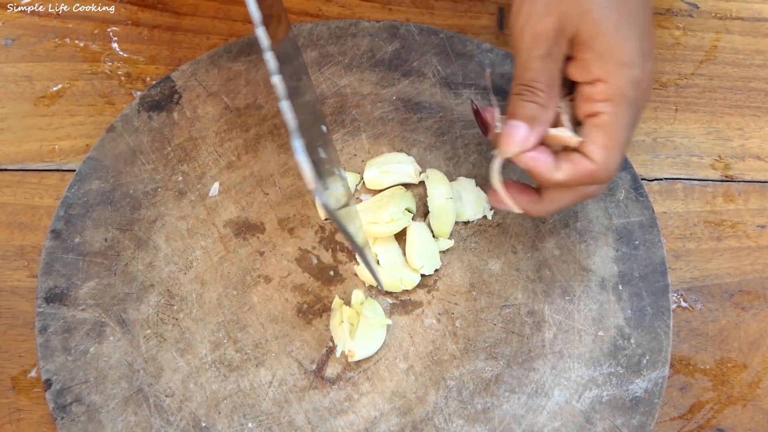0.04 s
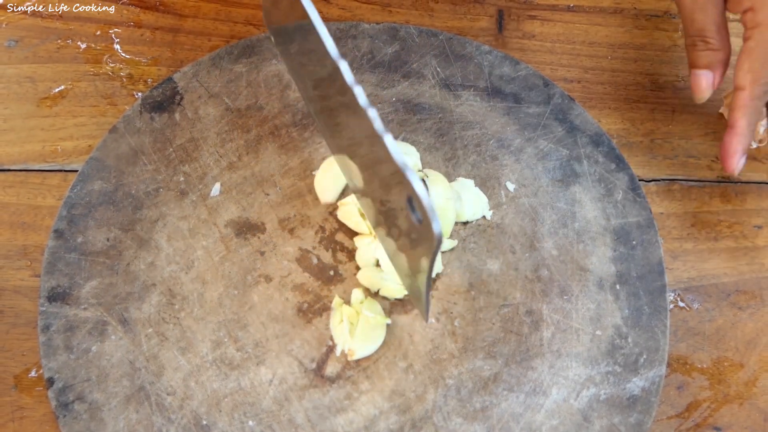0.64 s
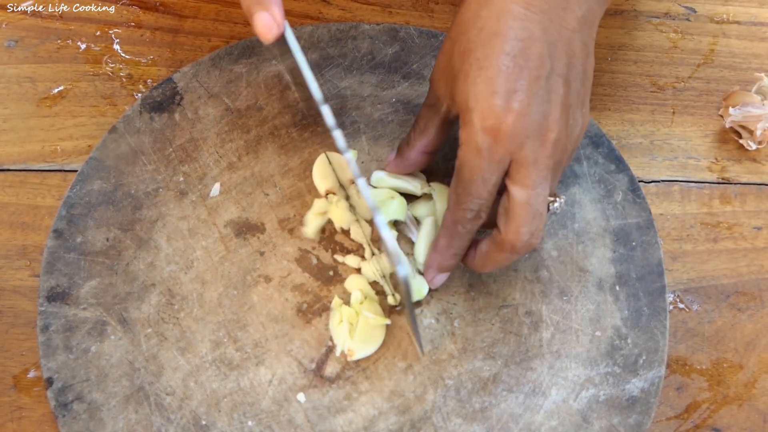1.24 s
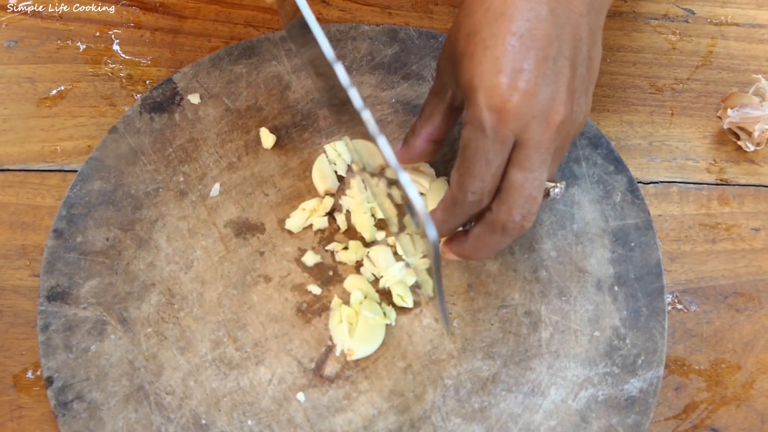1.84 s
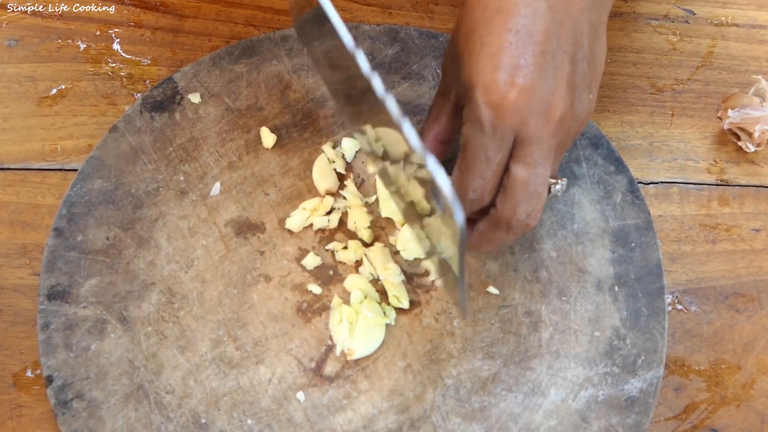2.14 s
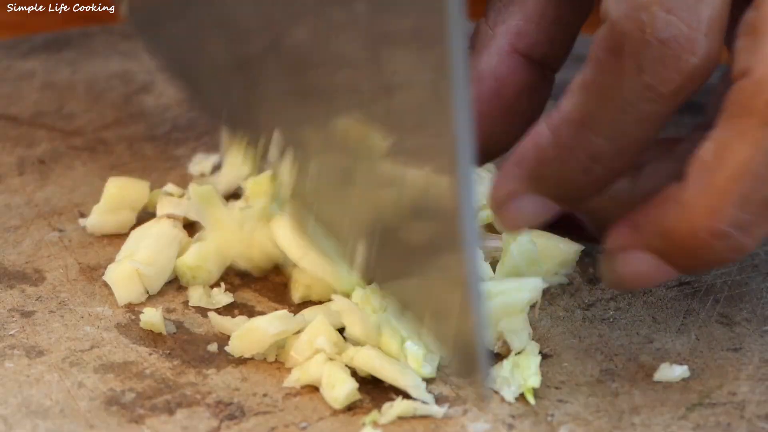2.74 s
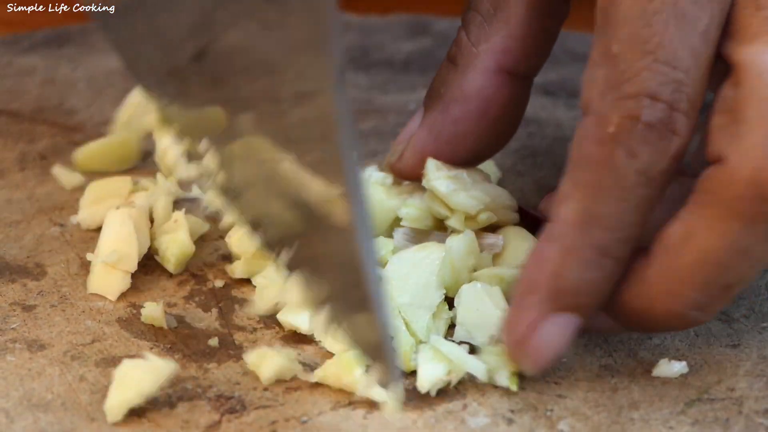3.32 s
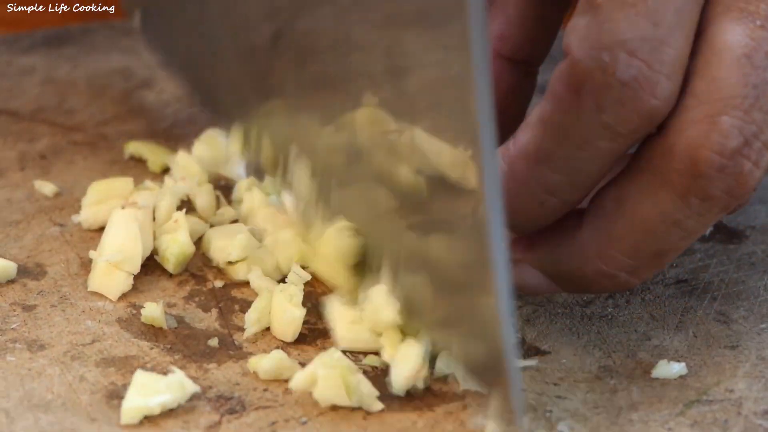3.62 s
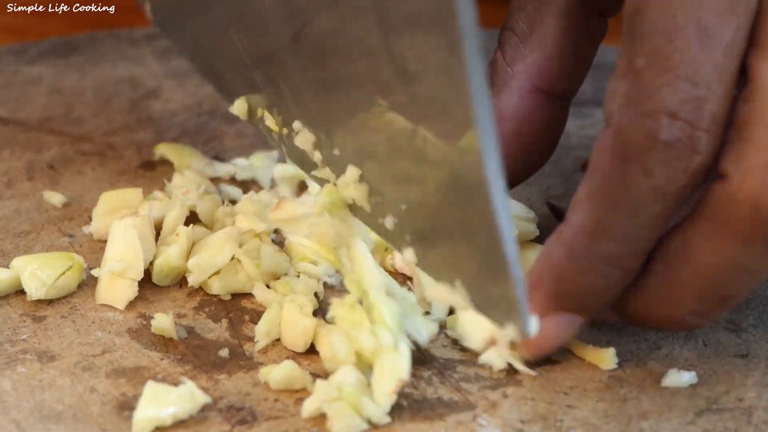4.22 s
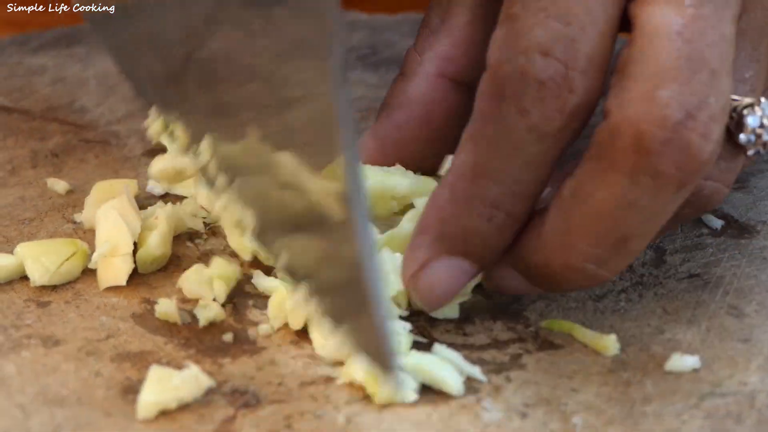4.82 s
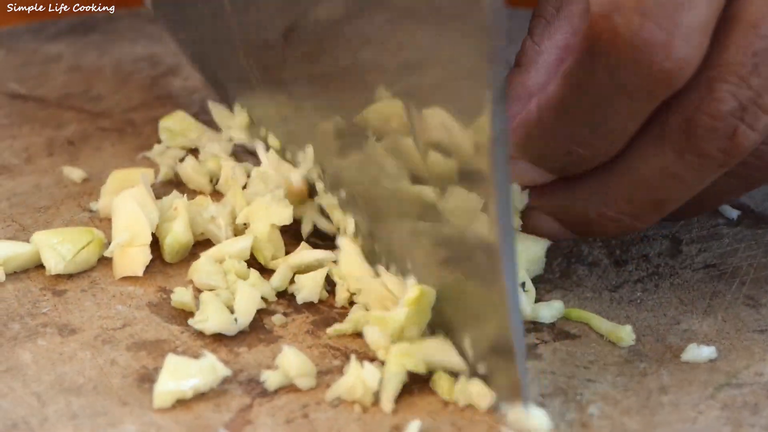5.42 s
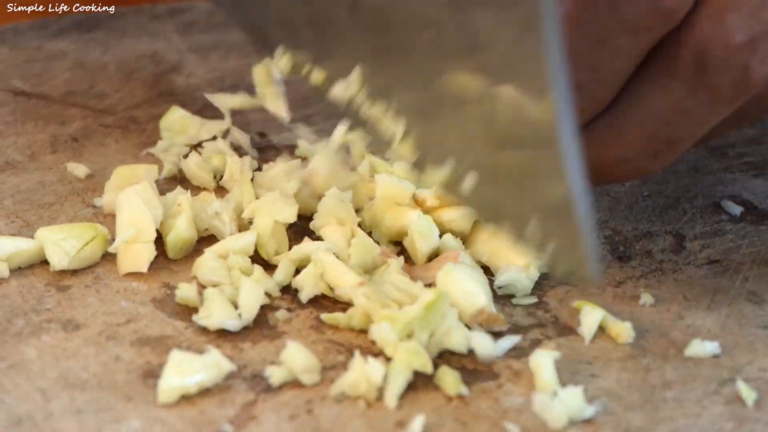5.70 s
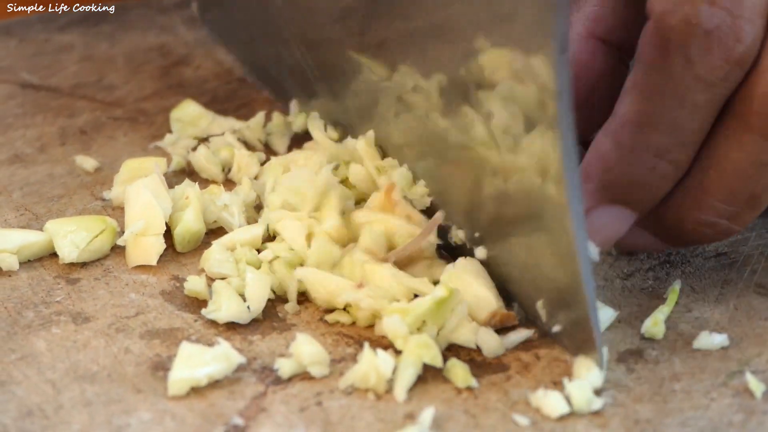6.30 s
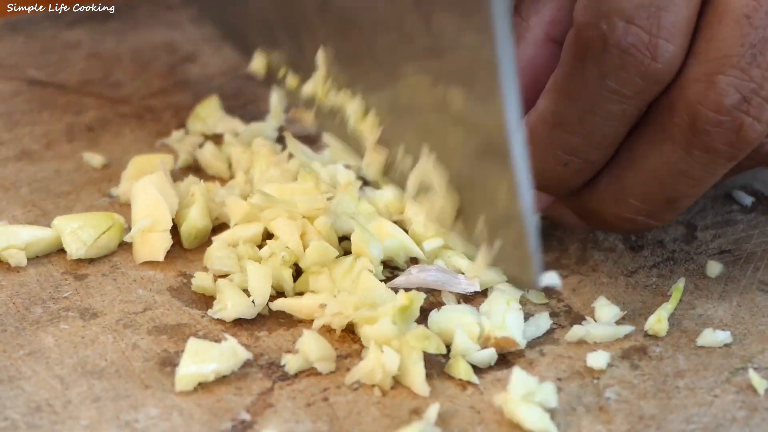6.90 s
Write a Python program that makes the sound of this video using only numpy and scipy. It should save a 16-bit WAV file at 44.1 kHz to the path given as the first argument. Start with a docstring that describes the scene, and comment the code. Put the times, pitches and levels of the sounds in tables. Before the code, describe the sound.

Dry garlic skins snap and rustle briefly under fingers. A cleaver makes two gentle cuts, then chops steadily, about four strokes a second, each a small crunch with a knock and thump on a thick wooden block. Partway through, the microphone moves closer and the thumps grow fuller. The place is half outdoors, with soft air noise, a far motor hum and faint birds.

```python
"""Half outdoors, over soft air noise and a far motor, small birds peep and a hand brushes dry skins away. Then
a cleaver starts on garlic, gently at first, on a thick round wooden block on a plank table. Each stroke
crunches through the cloves, knocks on the block and thumps the block on the table; nearby walls answer. Part
way through, the scene changes to close beside the block and the thumps grow stronger."""
import sys
import numpy as np
from scipy import signal
from scipy.fft import rfft, irfft
from scipy.io import wavfile
from scipy.ndimage import uniform_filter1d

SR = 44100
rng = np.random.default_rng(int(sys.argv[2]) if len(sys.argv) > 2 else 0)


def inscribe(sig):
    """Save sig as 16-bit PCM at rate SR to the path in sys.argv[1].

    A 1-D sig is mono; a 2-D sig holds one channel per row.
    Samples are clipped to [-1, 1] before scaling.
    """
    pcm = np.round(np.clip(np.atleast_2d(sig).T, -1, 1) * 32767)
    wavfile.write(sys.argv[1], SR, pcm.astype(np.int16))


N = 306483
TIME = np.arange(N) / SR
MOVE_S = 2.748  # when the scene changes from above the block to close beside it; the echoes from above stop short


def gain_of(db):
    """Turns decibels into a number to multiply by."""
    return 10 ** (np.asarray(db) / 20)


def unit_level(x):
    """Scales a signal to an average (rms) level of 1."""
    return x / np.sqrt(np.mean(x ** 2) + 1e-20)


def with_energy(x, db):
    """Gives a short sound as much energy as 10 ms of steady sound at this level."""
    return x * gain_of(db) / np.sqrt(np.sum(x ** 2) * 100 / SR + 1e-20)


def curve_at(points, hz):
    """Looks up values between a table's rows, on a log frequency scale."""
    row_hz, value = np.transpose(points)
    return np.interp(np.log(hz + 1), np.log(row_hz + 1), value)


def coloured(x, tone):
    """Turns frequencies up or down by a table of frequency_hz, gain_db."""
    hz = np.fft.rfftfreq(x.shape[-1], 1 / SR)
    return irfft(rfft(x) * gain_of(curve_at(tone, hz)), x.shape[-1])


def cut_below(x, hz, order=3):
    """Fades out what lies below hz; a higher order cuts more steeply."""
    return signal.sosfilt(signal.butter(order, hz, "high", fs=SR, output="sos"), x)


def add(mix, start_s, sound):
    """Mixes a sound in from start_s on."""
    start = round(start_s * SR)
    sound = sound[max(-start, 0):]
    part = mix[max(start, 0):][:len(sound)]
    part += sound[:len(part)]


def struck(tone_db):
    """Makes a sudden, fading tap with this tone (one level for each frequency step)."""
    log_gain = np.log(gain_of(np.r_[tone_db, tone_db[-2:0:-1]]))
    spectrum = np.exp(np.conj(signal.hilbert(log_gain)))  # packs the energy at the start
    return np.fft.ifft(spectrum).real[:len(tone_db)]


def waver(size, hz):
    """A random wobble of level and phase that changes about hz times a second."""
    noise = rng.standard_normal(size) + 1j * rng.standard_normal(size)
    keep_slow = np.exp(-(np.fft.fftfreq(size, 1 / SR) / hz) ** 2)
    wobble = np.fft.ifft(np.fft.fft(noise) * keep_slow)
    return wobble / np.sqrt(np.mean(abs(wobble) ** 2))


def outdoor_air(air_db=-56.5):
    """Steady low air noise and a soft hiss that comes and goes."""
    # the tone of each noise: frequency_hz, gain_db
    air_tone = [(20, -37), (45, -0.5), (75, -8), (150, 0), (260, -3.5), (480, -13.5), (1000, -9),
                (2000, -18.5), (4500, -25), (7800, -36.5), (10000, -52), (13000, -45), (16000, -68)]
    hiss_tone = [(100, 3), (400, 2), (1500, 5), (3500, 5), (5500, 1), (7800, -2), (10000, -1), (12500, -10),
                 (16000, -21)]
    # how the hiss rises and falls: time_s, level_db
    hiss_levels = [(0.0, -54.5), (0.5, -58.5), (0.6, -56.5), (1.55, -67.5), (2.75, -61), (2.88, -53),
                   (3.19, -60), (3.48, -58), (3.6, -53), (3.72, -58), (4.28, -61), (6.64, -67), (6.95, -63)]
    # how alike left and right are: frequency_hz, likeness (0 to 1)
    ear_likeness = [(30, 0.32), (150, 0.86), (500, 0.58), (2000, 0.55), (12000, 0.63)]
    alike = np.clip(curve_at(ear_likeness, np.fft.rfftfreq(N, 1 / SR)), 0, 1)
    left, unrelated = rfft(rng.standard_normal((2, 2, N)))
    right = alike * left + np.sqrt(1 - alike ** 2) * unrelated
    air, hiss = np.swapaxes(irfft(np.array([left, right]), N), 0, 1)
    air = gain_of(air_db) * unit_level(coloured(air, air_tone))
    hiss_gain = gain_of(np.interp(TIME, *np.transpose(hiss_levels)))
    return air + hiss_gain * unit_level(coloured(hiss, hiss_tone))


def far_motor(above_db=-4, close_db=0.5):
    """A far motor hums, a little louder once the scene has changed."""
    # its wavering tones: pitch_hz, level_db (before above_db or close_db is added)
    tones = [(75, -73.5), (152, -60), (222, -68), (404, -70.5)]
    hum = sum(gain_of(db) * unit_level((waver(N, 20) * np.exp(2j * np.pi * hz * TIME)).real)
              for hz, db in tones)
    return hum * gain_of(np.where(TIME < MOVE_S, above_db, close_db))


def bird_note(length_s, hz, fall_hz_per_s, blur_hz):
    """One note, level or falling, blurred by distance."""
    t = np.arange(-length_s / 2, length_s / 2, 1 / SR)
    cycles = np.cumsum(hz - fall_hz_per_s * t) / SR
    note = (waver(len(t), blur_hz) * np.exp(2j * np.pi * cycles)).real
    return unit_level(note * np.hanning(len(t)) ** 0.23)


def birds(peep_s=0.085, hoot_s=0.055):
    """One far bird peeps high and falling, another gives three low notes."""
    # the high bird: middle_s, pitch_hz, level_db
    peeps = [(.02, 4670, -54.5), (0.461, 5170, -51.5), (0.84, 4800, -56), (3.46, 4220, -55),
             (4.747, 4300, -62.5), (5.382, 4530, -60), (6.917, 4680, -62.5)]
    # the low bird: middle_s, level_db
    hoots = [(.455, -54), (0.573, -52.5), (0.683, -56)]
    out = np.zeros(N)
    for s, hz, db in peeps:
        add(out, s - peep_s / 2, gain_of(db) * bird_note(peep_s, hz, fall_hz_per_s=9100, blur_hz=1400))
    for s, db in hoots:
        add(out, s - hoot_s / 2, gain_of(db) * bird_note(hoot_s, hz=1014, fall_hz_per_s=0, blur_hz=43))
    return out


def wall_echoes(x, tone, echo_db, late_db, late_fade_s, width=0.26, first_s=0.0036, build_s=0.0011):
    """Table and walls throw back many quick echoes, then a faint longer tail; partly alike in both ears."""
    # how fast the quick echoes die: frequency_hz, fade_s (time to drop 60 dB)
    early_fades = [(100, 0.15), (400, 0.15), (1200, 0.18), (3000, 0.09), (10000, .09)]
    # the longer tail, strongest in the middle: frequency_hz, gain_db
    late_tone = [(150, -3.5), (600, -4.5), (1200, 7), (2300, 2.5), (4500, -7), (12000, -24)]
    size = SR * 2 // 3
    mid, side = rng.choice([-1., 1.], (2, size)) * (rng.random((2, size)) < 6000 / SR)  # 6000 a second
    hz, t, bands = signal.stft(np.array([mid + width * side, mid - width * side]), SR, nperseg=256)
    early = gain_of(-60 * t / curve_at(early_fades, hz)[:, None])
    late = gain_of(late_db + curve_at(late_tone, hz)[:, None] - 60 * t / late_fade_s)
    tail = signal.istft(bands * (early + late), SR, nperseg=256)[1][:, :size]
    tail *= np.clip((TIME[:size] - first_s) / build_s, 0, 1)
    # many paths share the energy evenly over neighbouring frequencies
    spectrum = rfft(tail)
    spectrum /= np.sqrt(uniform_filter1d((abs(spectrum) ** 2).mean(0), size=90))
    tail = coloured(irfft(spectrum, size), tone)
    return gain_of(echo_db) * signal.fftconvolve(x[None], tail, axes=1)[:, :N]


def shifting_echoes(x, tone, echo_db, late_db, late_fade_s, patterns=3, shift_hz=0.63):
    """Hands and blade keep moving, so the pattern of echoes shifts from stroke to stroke."""
    shares = [np.sqrt(2 / patterns) * np.cos(np.pi * (2 * shift_hz * TIME + k / patterns))
              for k in range(patterns)]
    return sum(wall_echoes(x * share, tone, echo_db, late_db, late_fade_s) for share in shares)


def crackle(spread_s, tone, grain_db):
    """A cloud of tiny cracks, strongest at its middle; more grain_db makes it rougher."""
    t = np.arange(-SR // 8, SR // 8) / SR
    crack_sizes = gain_of(grain_db * np.minimum(rng.exponential(1, len(t)), 5))
    swell = np.exp(-(abs(t) / (1.12 * spread_s)) ** 0.81)
    cloud = rng.standard_normal(len(t)) * crack_sizes * swell
    return cut_below(coloured(cloud, tone), hz=200)


def garlic_skins(snap_boost_db=4, small_snaps=12, clearing_s=(0.17, 0.69)):
    """Papery skins snap and rustle under the fingers."""
    # the main snaps: time_s, peak_db (before the boost)
    snaps = [(0.0624, -32.5), (0.2225, -29), (0.267, -36), (0.393, -36), (0.4447, -34.5), (0.5436, -31),
             (1.278, -40)]
    # fingers and blade brushing the garlic: middle_s, level_db (before length_gain), spread_s
    brushes = [(0.209, -51.5, 0.0066), (0.279, -56.5, 0.0071), (.343, -42.5, 0.008), (.47, -54.5, 0.05),
               (.57, -53, 0.037), (0.877, -54, 0.022), (1.327, -37, 0.0036), (2.262, -49, 0.0038)]
    # the tone of a snap and of a brush: frequency_hz, gain_db
    snap_tone = [(500, -22), (3000, 2.5), (6000, 2), (8000, 0), (10500, 9.5), (13000, -3.5), (16000, -6)]
    brush_tone = [(300, 9), (1500, -4.5), (3000, 3), (5500, 2.5), (7800, -2.5), (10300, 0.5), (13000, -12),
                  (16000, -17)]
    out = np.zeros(N)
    # smaller snaps fall at random while the hand clears the skins
    small = [(rng.uniform(*clearing_s), rng.normal(-42.5, 5)) for _ in range(small_snaps)]
    for s, db in snaps + small:
        snap = crackle(0.00055, snap_tone, grain_db=2)
        add(out, s + 0.0013 - len(snap) / SR / 2, gain_of(db + snap_boost_db) * snap / abs(snap).max())
    for s, db, spread_s in brushes:
        brush = crackle(spread_s, brush_tone, grain_db=3)
        length_gain = np.sqrt(spread_s / 0.0042)
        add(out, s - len(brush) / SR / 2, with_energy(brush, db) * length_gain)
    return out


def block_thump(hz, swell_cycles=0.46, still_hz=410, still_width_hz=130):
    """The heavy block sinks into the table and rocks back, for about two cycles."""
    cycles = hz * np.arange(SR // 12) / SR
    age = cycles / swell_cycles
    rocking = -np.sin(2 * np.pi * (cycles - .06)) * (age * np.exp(1 - age)) ** 1.61
    # the wood barely moves between its rocking pitch and its knocking pitch
    rocking = signal.lfilter(*signal.iirnotch(still_hz, still_hz / still_width_hz, fs=SR), rocking)
    return cut_below(rocking, hz * 0.35, order=2)  # slow motion makes little sound


def blade_leans():
    """A slow push moves block and table together, lower than a chop."""
    # the blade leaning on the block around the first gentle cuts: start_s, level_db
    pushes = [(0.346, -45), (0.614, -27), (0.851, -29.5)]
    out = np.zeros(N)
    for s, db in pushes:
        add(out, s, with_energy(block_thump(hz=103), db))
    return out


def wood_ring(thump_db, knock_db, split_hz=700, scatter_db=2):
    """Block and planks ring on: the thump starts their low tones, the knock their high ones."""
    # the wood's tones: pitch_hz, level_db (relative to thump or knock), fade_s (time to drop 60 dB)
    tones = [(44, -49, 0.3), (115.5, -24.5, 0.24), (152.7, -41, 0.45), (230, -67, 0.12),
             (308.2, -7.5, 0.077), (486, -30.5, 0.16), (1078, -21, 0.13), (1196, -16, 0.11)]
    t = np.arange(SR // 3) / SR
    ring = np.zeros(len(t))
    for hz, db, fade_s in tones:
        start_db = (thump_db if hz < split_hz else knock_db) + rng.normal(db, scatter_db)
        ring += gain_of(start_db - 60 * t / fade_s) * np.sin(2 * np.pi * hz * t)
    return ring * (1 - np.exp(-t / 0.00071))


def blade_ring(scatter_db=3):
    """The steel sings for a moment, differently with each grip, until hand and wood quiet it."""
    # the steel's tones: pitch_hz, level_db (relative to the crunch), fade_s (time to drop 60 dB)
    tones = [(2100, -15, 0.026), (2600, -16, .03), (3800, -4.5, 0.039), (4930, -37, 0.027), (5840, -6, .04),
             (6440, -15, 0.05), (8400, -37, 0.033), (9100, -23, .05), (10400, -22, 0.032),
             (12300, -31, 0.034)]
    t = np.arange(SR // 8) / SR
    ring = np.zeros(len(t))
    for hz, db, fade_s in tones:
        fade = gain_of(rng.normal(db, scatter_db) - 60 * t / fade_s)
        ring += fade * np.sin(2 * np.pi * (hz * t + rng.random()))
    return ring * (1 - np.exp(-t / 0.0017))


def garlic_crunch(treble_db, crush_ms):
    """Cloves split under the edge; more garlic draws the crunch out."""
    # the splitting, with a low push on the block as the cloves give way: frequency_hz, gain_db
    tone = [(50, 34), (110, 41.5), (400, 0.5), (1000, 3), (2000, 7), (3000, 3), (5500, 2), (7800, -3.5),
            (10000, 0.5), (13000, -8.5), (16000, -13.5)]
    spread_ms = 0.58 + 0.62 * max(crush_ms, 0)
    crunch = crackle(spread_ms / 1000, tone, grain_db=2.5)
    treble = cut_below(crunch, hz=5000, order=4)
    return with_energy(crunch, treble_db) * crunch.std() / treble.std()


def knock(bite_db, edge_db):
    """The edge meets the block: the spot it hits sets the woody bite, a clean hard hit adds treble."""
    # steel on end grain: frequency_hz, gain_db
    tone = [(50, -47), (150, -36), (480, -26), (650, -7), (730, -11), (820, -1.5), (950, 2.5), (1090, -7.5),
            (1240, -5), (1800, -17.5), (2200, -29.5), (2800, -26.5), (5000, -37), (8000, -57.5),
            (12000, -60), (16000, -67)]
    hz = np.fft.rfftfreq(4096, 1 / SR)
    bite_band = curve_at([(1050, 0), (1350, 1), (1950, 1), (2600, 0)], hz)
    edge_band = curve_at([(1700, 0), (2200, 1), (5000, 1), (9000, .3)], hz)
    # each spot favours other high tones
    ripple = uniform_filter1d(uniform_filter1d(rng.standard_normal(len(hz)), size=30), size=22)
    spot_db = curve_at([(900, .8), (2500, 2.5)], hz) * unit_level(ripple)
    return struck(curve_at(tone, hz) + bite_db * bite_band + edge_db * edge_band + spot_db)


def blade_landing(bite_db, edge_db, heel_db=-6, heel_delay_s=(.0012, .0033)):
    """The tip lands first, the heel (the handle end) a moment later with a thinner tick."""
    landing = knock(bite_db, edge_db)
    heel = cut_below(knock(bite_db, edge_db), hz=1500)
    add(landing, rng.uniform(*heel_delay_s), gain_of(heel_db) * heel)
    return landing


def cleaver(gentle_below_db=-28.5, thump_delay_s=0.0012):
    """Each stroke crunches through the garlic, knocks, thumps and leaves steel and wood ringing."""
    # the strokes: contact_s, knock_db, bite_db, edge_db, crunch_db, crush_ms (time spent crushing garlic)
    chops = [(0.617, -37.5, -24, 0, -37.5, 3.5), (0.8528, -33.5, -10, -11, -33, 2),
             (1.0792, -12, -1, 7.5, -34.5, 1.5), (1.3115, -12.5, 2.5, 8, -34, 2),
             (1.5449, -13, -5, -2, -35.5, 1.37), (1.7738, -15.5, -4, -6.5, -39.5, 2.5),
             (2.0065, -12, 2, 9.5, -37.5, 0.5), (2.2492, -13.5, 4, 3.5, -39.5, 2),
             (2.4794, -42, 4, -5, -39, 4), (2.7056, -13, 5.5, 9.5, -34.5, -0.07),
             (2.8463, -19.5, -5.5, 1.5, -39.5, 4.5), (3.0685, -14, 5, 4, -42.5, 1.5),
             (3.2906, -17, -2, -1, -44, 4.5), (3.509, -36.5, -6, 3, -39, 4.5),
             (3.7188, -14, 0.5, 8.5, -37.5, 1.4), (3.9331, -17, 2, 2, -40, 4.5),
             (4.1441, -16, -1.5, 3.5, -42, 1), (4.3553, -14.5, -0.5, 9, -43, 1.5),
             (4.5822, -16, -2.5, 5.5, -40.5, 0.5), (4.7905, -15.5, 2.5, 6, -43.5, 2.5),
             (4.9962, -27.5, -7, 2, -46.5, 2), (5.2064, -16.5, 3.5, -2, -45.5, 1.1),
             (5.4216, -15, 4, 3, -44.5, 0.4), (5.6374, -16.5, 2.5, 1, -46, 3),
             (5.8617, -16.5, -0.5, -1.5, -47.5, 0.7), (6.1669, -24.5, -17, -1.5, -40, 3),
             (6.371, -14.5, 6, 6, -46, 1.5), (6.5876, -17, 4.5, -5.5, -50, 4),
             (6.8154, -30, -12, 3, -45, 3.5)]
    out = np.zeros(N)
    for s, knock_db, bite_db, edge_db, crunch_db, crush_ms in chops:
        # the thump is stronger and rounder from close by, softer and lower for a gentle stroke
        full_thump_db, swell_cycles = (-15.5, 0.62) if s > MOVE_S else (-19, 0.52)
        held_back_db = max(gentle_below_db - knock_db, 0)
        thump_db = full_thump_db - 1.14 * held_back_db
        thump = block_thump(hz=238 - 2.5 * held_back_db, swell_cycles=swell_cycles)
        crunch = garlic_crunch(crunch_db, crush_ms)
        split_s = s - 0.85 * crush_ms / 1000  # more garlic starts the crunch earlier
        add(out, split_s - len(crunch) / SR / 2, crunch)
        add(out, split_s, gain_of(crunch_db) * blade_ring())
        add(out, s, with_energy(blade_landing(bite_db, edge_db), knock_db))
        add(out, s + thump_delay_s, with_energy(thump, thump_db))
        add(out, s, wood_ring(thump_db, knock_db))
    return out


def left_and_right(x):
    """Sound reaches the microphone's two openings with slightly different timing and level."""
    # how far left is ahead of right: frequency_hz, lead_radians
    lead = [(100, 0), (400, .15), (950, .62), (1300, .3), (2000, .6), (2600, -.5), (4500, -.5),
            (12000, .55)]
    # how much louder left is than right: frequency_hz, gain_db
    balance = [(100, -2), (400, -0.88), (900, -1.1), (2400, 0.81), (5000, -0.47), (15000, .3)]
    hz = np.fft.rfftfreq(N, 1 / SR)
    half = gain_of(curve_at(balance, hz) / 2) * np.exp(.5j * curve_at(lead, hz))
    return irfft(rfft(x) * np.array([half, 1 / half]), N)


def scene():
    """The block heard from above, then from close beside it."""
    # the tone of the echoes in each microphone position: frequency_hz, gain_db
    tone_above = [(60, -9.5), (150, -17), (240, -18), (340, -9.5), (470, -2.5), (600, -6), (950, -23),
                  (1300, -18), (2200, -12.5), (3400, -18.5), (9000, -18)]
    tone_close = [(60, -24), (150, -14), (240, -19.5), (330, -12.5), (410, -5.5), (500, 0.5), (650, -11),
                  (950, -21.5), (1200, -19), (2200, -16.5), (3200, -19.5), (9000, -19)]
    work = cleaver() + blade_leans() + garlic_skins()
    above = TIME < MOVE_S
    echoes = shifting_echoes(work * above, tone_above, echo_db=3, late_db=-27, late_fade_s=0.77) * above
    echoes += shifting_echoes(work * ~above, tone_close, echo_db=4, late_db=-28.5, late_fade_s=0.92)
    return left_and_right(work + birds()) + echoes + outdoor_air() + far_motor()


def record(dry, lowest_hz=38, highest_hz=16000):
    """The microphone loses the deepest bass, clips peaks at full scale and drops the highest treble."""
    heard = np.clip(cut_below(dry, lowest_hz), -1, 1)
    treble_cut = signal.firwin(255, highest_hz, window=("kaiser", 9), fs=SR)
    return signal.oaconvolve(heard, treble_cut[None], "same")


dry = scene()
out = record(dry)
inscribe(out)
```